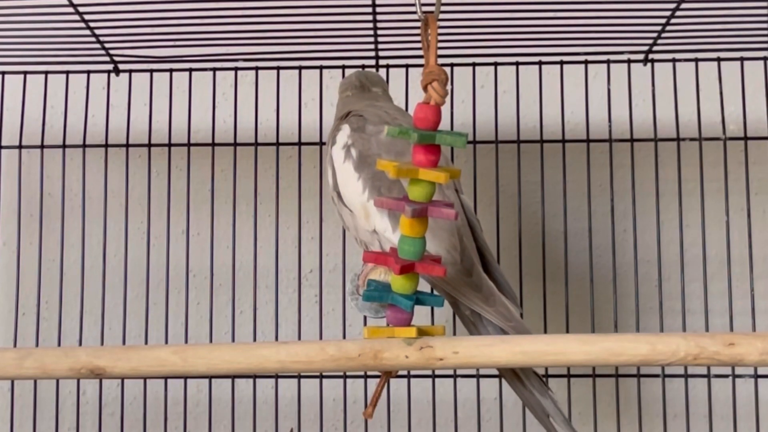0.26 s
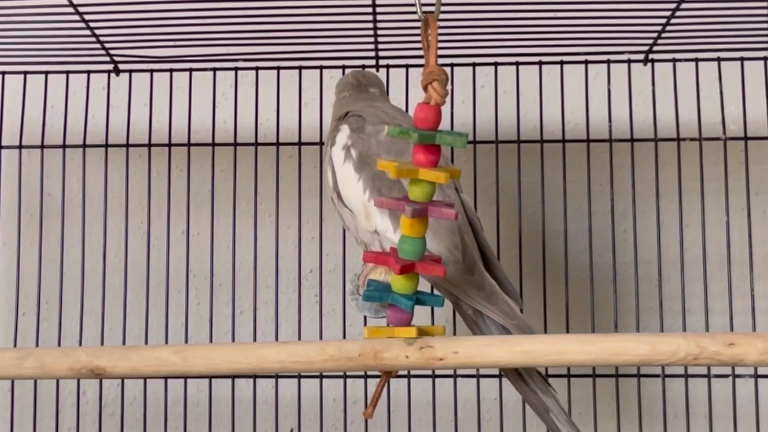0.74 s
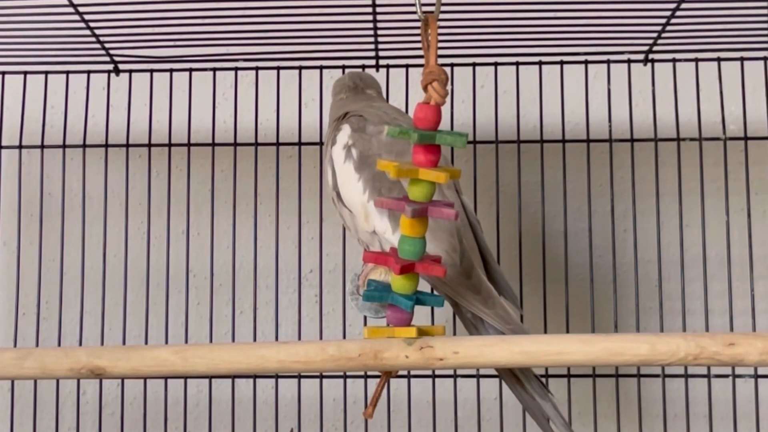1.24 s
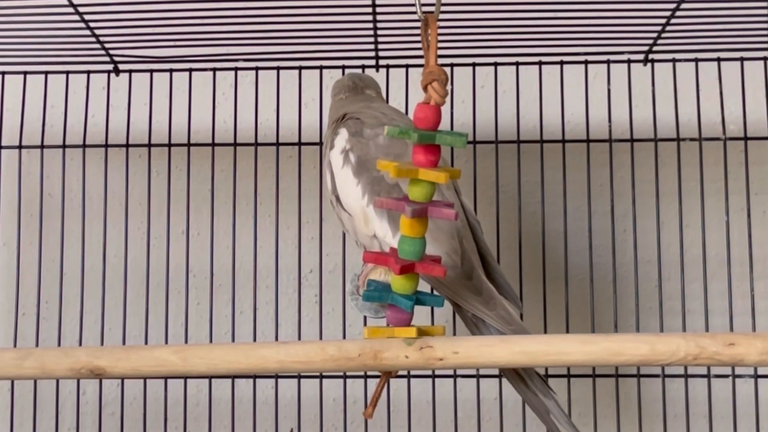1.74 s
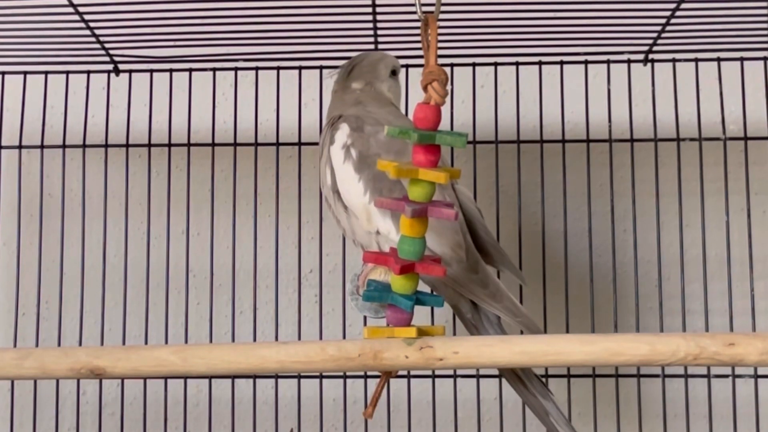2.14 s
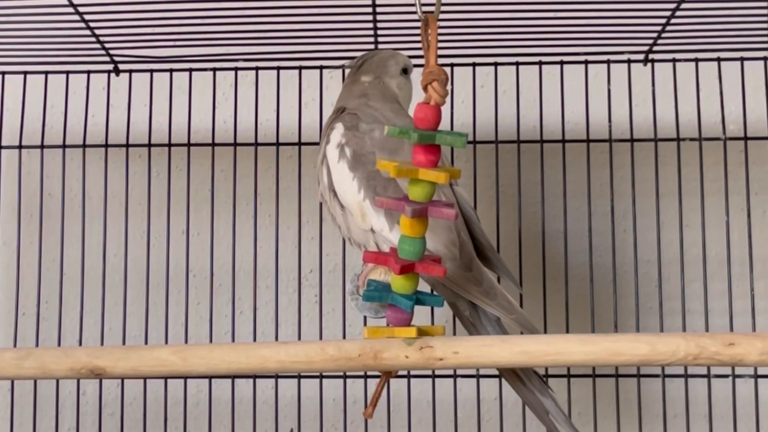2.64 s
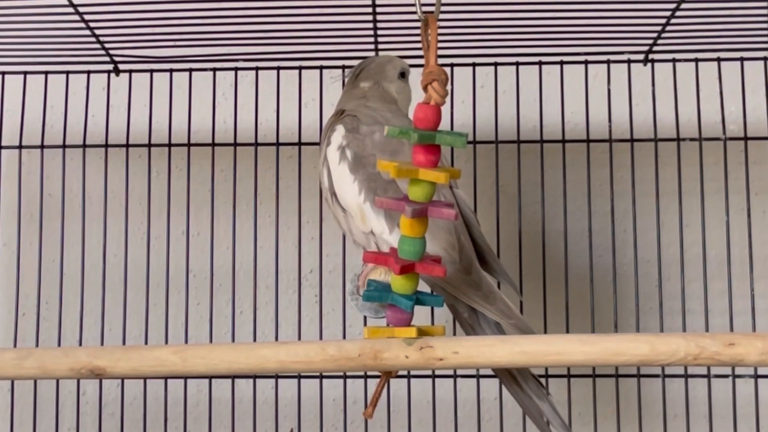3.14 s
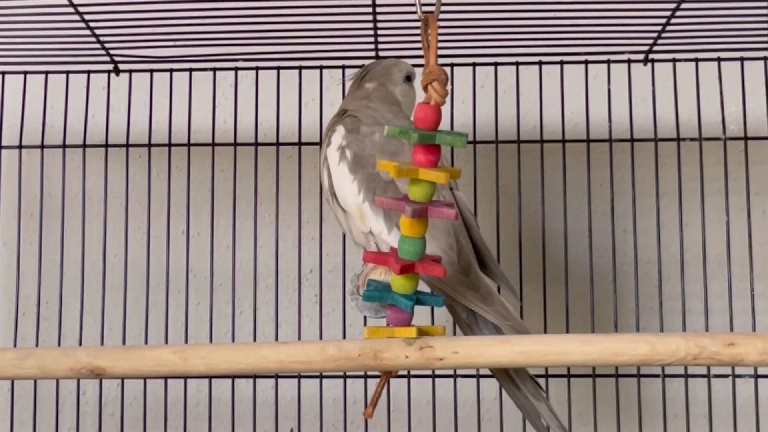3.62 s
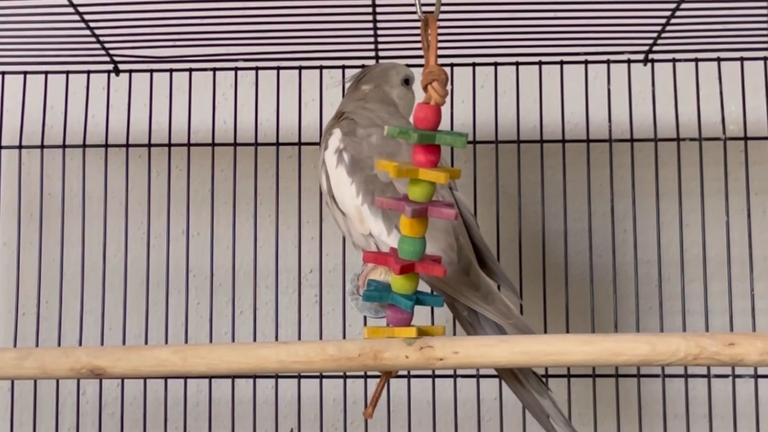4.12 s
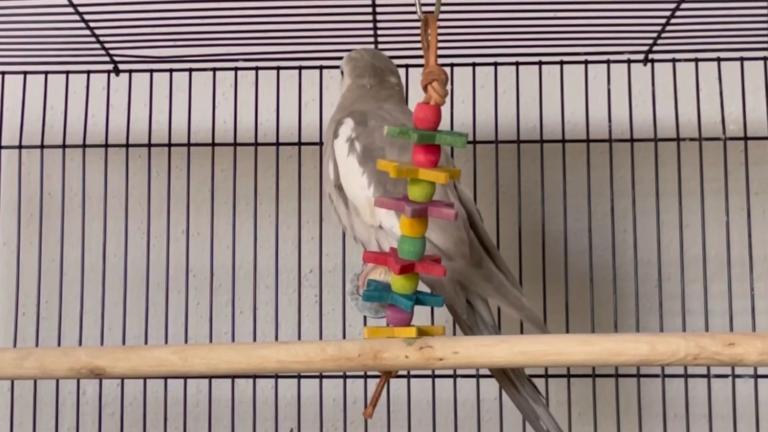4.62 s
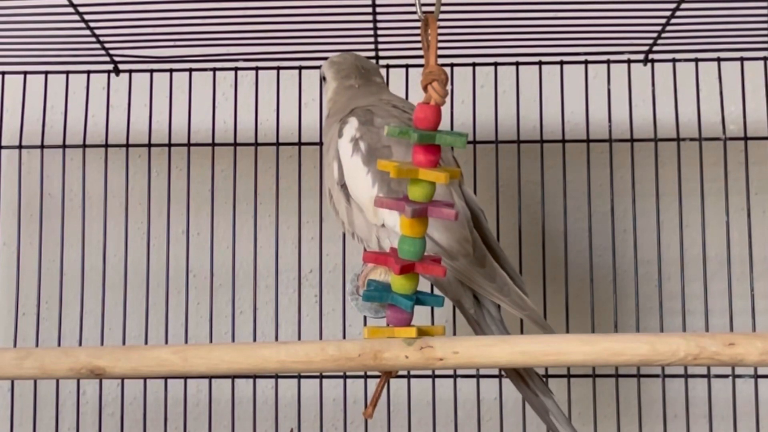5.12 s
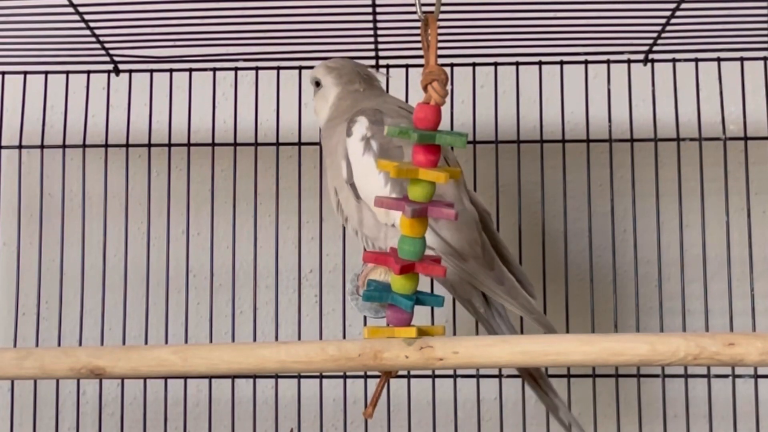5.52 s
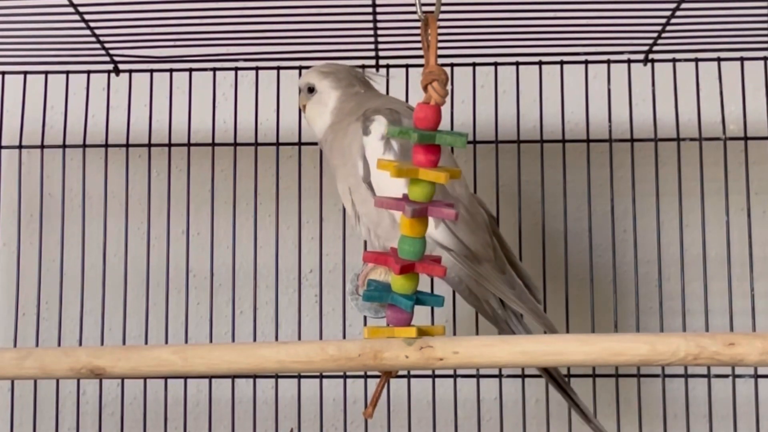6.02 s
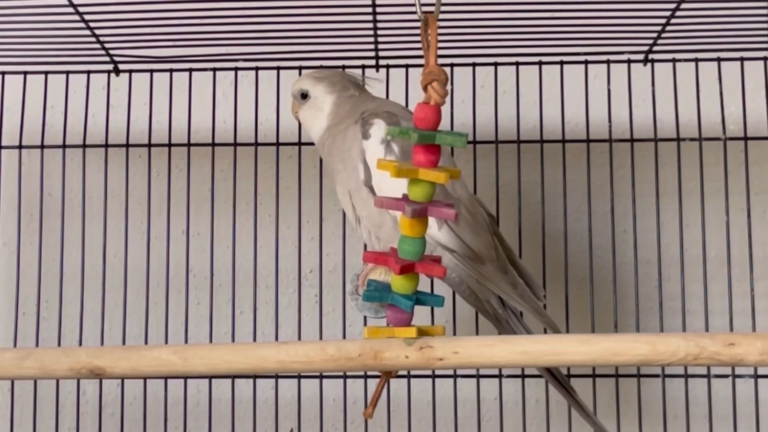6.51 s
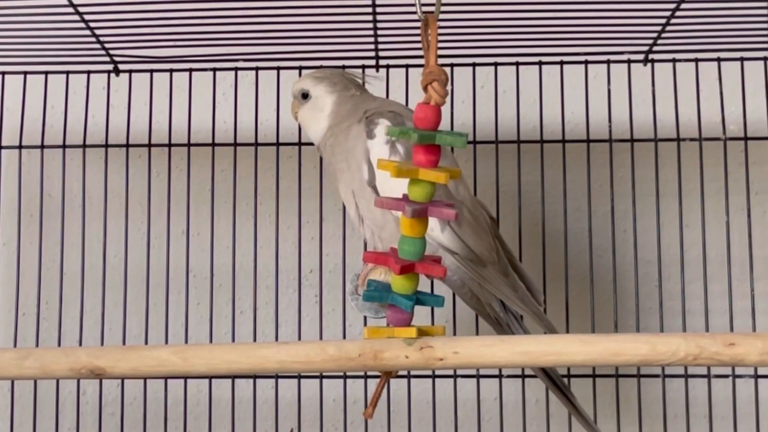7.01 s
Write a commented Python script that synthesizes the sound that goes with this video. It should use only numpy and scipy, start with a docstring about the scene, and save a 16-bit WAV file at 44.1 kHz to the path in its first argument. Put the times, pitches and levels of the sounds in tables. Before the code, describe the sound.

Close stereo pickup of one cockatiel in a small hard-walled room with lively echo and faint low rumble. It gives isolated clear whistles and quiet husky chips, rests, then buzzes softly and slides through longer whistles, one sweeping strongly upward. After a second rest come rough, bright chirps, quick chips and a row of four calls that break downward, then a swelling buzzy trill and a tiny final note.

```python
"""Cockatiel in a cage

A cockatiel sings in its cage in a small, bare room with a low hum. Beak nearly shut: almost pure gliding
whistles and buzzing trills. Beak open: bright calls, arches that break up as they fall, short chips.
Each note is a sum of overtones coloured by the throat, plus turbulence where rough; the walls ring on.
"""
import sys
import numpy as np
from scipy import signal
from scipy.fft import rfft, irfft, next_fast_len
from scipy.io import wavfile
from scipy.ndimage import map_coordinates

SR = 44100
rng = np.random.default_rng(int(sys.argv[2]) if len(sys.argv) > 2 else 0)


def put_to_file(sound):
    """Save the sound as 16-bit audio at rate SR, in the file named by the first command-line argument."""
    columns = np.atleast_2d(sound).T  # one column per channel
    safe = np.clip(columns, -1, 1)
    whole_steps = np.round(safe * 32767)
    wavfile.write(sys.argv[1], SR, whole_steps.astype(np.int16))


N = 320166
TOP_HZ = 15700  # band limit
ATTACK_S, RELEASE_S = 0.004, 0.006


def amp(db):
    """Decibels to gain."""
    return 10 ** (np.asarray(db) / 20)


def unit(x):
    """Scale to rms 1."""
    return x / np.sqrt(np.mean(x ** 2) + 1e-20)


def along(points, hz):
    """Interpolate (freq_hz, value) points on a log frequency axis."""
    freq_hz, value = np.transpose(points)
    return np.interp(np.log(hz + 1), np.log(freq_hz), value)


def wobble(rate_hz, size):
    """Smooth random curve with rate_hz knots a second."""
    knots = rng.standard_normal(int(size * rate_hz / SR) + 4)
    return map_coordinates(knots, [np.arange(size) * rate_hz / SR])


def filtered(x, response):
    """Multiply the spectrum of x by a complex response of frequency."""
    size = x.shape[-1]
    padded = next_fast_len(size + 2048)
    spectrum = rfft(x, padded) * response(np.fft.rfftfreq(padded, 1 / SR))
    return irfft(spectrum, padded)[..., :size]


def noise(spectrum, shape):
    """Coloured noise of rms 1."""
    white = rng.standard_normal(shape)
    return unit(filtered(white, lambda hz: amp(along(spectrum, hz))))


def add(track, start_s, sound):
    """Mix a sound into a track at start_s."""
    part = track[max(round(start_s * SR), 0):][:len(sound)]
    part += sound[:len(part)]


def clock(length_s):
    """Time within a note in seconds, and its progress 0-1."""
    t = np.arange(int((length_s + RELEASE_S / 2) * SR)) / SR
    return t, np.minimum(t / length_s, 1)


def fade(t):
    """Attack, hold and release of a note."""
    nearest_end = np.minimum(t / ATTACK_S, (t[-1] - t) / RELEASE_S)
    return np.sin(np.pi / 2 * np.clip(nearest_end, 0, 1)) ** 2


def push(u, crest, swell_db, shape=1.12):
    """One push of air: dB below its peak at share crest of the note; shape above 1 rounds the peak."""
    return swell_db * (np.abs(u - crest) / max(crest, 1 - crest)) ** shape


# throat colour, beak shut: freq_hz, level_db (relative)
THROAT_SHUT = [(600, -28), (1300, -10.5), (1750, -12.5), (2600, -8), (3000, -9.5), (3700, -16), (5200, -19),
               (7800, -23), (8700, -30), (10400, -23), (13000, -14), (15500, -31)]
# throat colour, beak open: freq_hz, level_db (relative)
THROAT_OPEN = [(600, -33), (1500, -2), (2200, 0), (2650, -7), (3200, 6), (3800, -7.5), (4500, 3.5),
               (5100, -24), (5700, -2), (6700, -18), (7700, -26.5), (9500, -23.5), (11300, -25.5),
               (12500, -38.5)]
# turbulence spectrum of a rough note: freq_hz, density_db (relative, per Hz)
TURBULENCE = [(300, -45.5), (700, -29), (1300, -8.5), (2100, -11), (2900, -2.5), (3600, -13), (5300, -24.5),
              (7500, -50), (15000, -64)]


def syrinx(hz, rough, opening, jitter=0.079, flutter=0.09, tremor=0.0061, shimmer_db=6, doubling=0.35,
           rasp_db=-1, shut_db=-22, open_db=-2, slope_db=-4, slack_db=-12, taut_hz=2600):
    """Vibrating membranes heard through the throat; roughness shakes their cycle and adds turbulence."""
    size, rough = len(hz), np.clip(rough, 0, 1)
    shake = rough * (jitter * wobble(1100, size) + flutter * wobble(260, size))
    unsteady = shake + tremor * wobble(350, size)
    phase = 2 * np.pi * np.cumsum(hz * (1 + unsteady)) / SR
    k = np.arange(1, 9)[:, None]  # harmonic number
    shut = 1 - opening
    # an open beak brings out the overtones; slack membranes make low whistles duller
    octave_db = slope_db + slack_db * shut * np.log2(taut_hz / hz)
    overtone_db = shut * shut_db + opening * open_db + octave_db * np.log2(k / 2)
    throat_db = shut * along(THROAT_SHUT, k * hz) + opening * along(THROAT_OPEN, k * hz)
    partials = amp(throat_db + (k > 1) * overtone_db) * (k * hz < TOP_HZ)
    tone_rms = np.sqrt(np.sum(partials ** 2, axis=0) / 2)
    tone = np.sum(partials * np.sin(k * phase), axis=0) / tone_rms
    # a rough note breaks into spurts, its cycles alternately strong and weak
    spurts = amp(rough * shimmer_db * wobble(330, size))
    alternation = 1 + rough ** 2 * doubling * np.sin(phase / 2)
    tone = tone * spurts * alternation
    turbulence = amp(rasp_db) * rough ** 2 * noise(TURBULENCE, size) * (1 + np.cos(phase) / 2)
    return (tone + turbulence) / np.sqrt(1 + rough ** 2)


SLACK_SHARE, SLACK_S = 0.63, 0.011  # pitch share a broken note sinks to, time constant
BREAK_S, FADE_DB_PER_S = 0.0026, 99.5  # onset of the break, decay of the fall
BREAK_DB, ROUGH_BREAK_DB = 4.5, 15  # loss in a clean break, extra loss in a fully rough one
FRAY_S, FRAY_ROUGH = 0.012, 0.13  # extra roughness around the break


def sung(t, length_s, hz, db, rough, opening, overtone_db, fall_rough, slack_s):
    """Note that may break after length_s: slack membranes lower its pitch and level, roughness shifts."""
    after_s = np.maximum(t - length_s, 0)
    broken = 1 - np.exp(-after_s / BREAK_S)
    frayed = np.exp(-np.abs(t - length_s - BREAK_S) / FRAY_S)
    pitch_hz = hz * (SLACK_SHARE + (1 - SLACK_SHARE) * np.exp(-after_s / slack_s))
    loss_db = (BREAK_DB + ROUGH_BREAK_DB * fall_rough) * broken + FADE_DB_PER_S * after_s
    rough = rough + (fall_rough - rough) * broken + FRAY_ROUGH * frayed
    voice = syrinx(pitch_hz, rough, opening, shut_db=overtone_db, open_db=overtone_db)
    return fade(t) * amp(db - loss_db) * voice


def glides(notes, opening, clean, hoarse, bend=1.8):
    """Swelling notes that glide, lingering near the top; the weaker the air at the start, the hoarser."""
    track = np.zeros(N)
    for (start_s, length_s, start_hz, end_hz, peak_db, crest, swell_db,
         overtone_db, fall_s, fall_rough) in notes:
        t, _ = clock(length_s + fall_s)
        u = np.minimum(t / length_s, 1)
        way = 1 - (1 - u) ** bend if end_hz > start_hz else u ** bend
        pitch_hz = start_hz + (end_hz - start_hz) * way
        weak_db = push(u, crest, swell_db)
        rough = clean + hoarse * (u < crest) * (weak_db / 20) ** 2
        held_s = length_s if fall_s > ATTACK_S else np.inf  # without a fall the note never breaks
        note = sung(t, held_s, pitch_hz, peak_db - weak_db, rough, opening, overtone_db, fall_rough, SLACK_S)
        add(track, start_s, note)
    return track


# whistles: start_s, length_s, start_hz, end_hz, peak_db, crest (0-1), swell_db, overtone_db,
# fall_s, fall_rough (0-1)
WHISTLES = [ (0, 0.046, 2626, 2519, -15.5, 0.3, 2.5, -21, 0.047, .17),
            (.285, .012, 2010, 1889, -35, 1, 4.5, -17, 0.029, .4),
            (.997, .032, 3162, 2735, -16, .9, 11.5, -24.5, .007, .4),
            (1.137, 0.085, 2270, 2536, -16.5, .95, 21, -20.5, 0.0658, .2),
            (1.359, 0.021, 2960, 2694, -16.5, .7, 6, -22.5, 0.017, 0.1),
            (2.687, 0.03, 1200, 1483, -34, 1, 13, -21, 0, 0),
            (2.777, 0.03, 1210, 1316, -37, .7, 5, -13.5, 0.0054, 0),
            (3.033, .225, 1697, 1773, -27, 0.39, 12, -23, 0.0068, 0),
            (3.339, .108, 2464, 2684, -17.5, .45, 4.5, -26.5, 0.036, 0.7),
            (3.568, .225, 1210, 2755, -15, 0.68, 23.5, -24.5, 0.01, 0),
            (3.91, 0.076, 2850, 2905, -16, 0.9, 15.5, -29, 0.01, 0),
            (3.999, .006, 2758, 2738, -11, 0.6, 6, -21.5, 0.01, 0.1),
            (7.218, 0.061, 1312, 1348, -34, .95, 14, -24.5, 0, 0)]


def whistles():
    """Beak shut: the throat damps the overtones and leaves almost pure glides."""
    return glides(WHISTLES, opening=0, clean=0.045, hoarse=0.22)


# bright calls: start_s, length_s, start_hz, end_hz, peak_db, crest (0-1), swell_db, overtone_db,
# fall_s, fall_rough (0-1)
BRIGHT_CALLS = [ (5.123, .087, 1898, 1952, -28.5, 0.75, 11, 8, 0, 0),
                (5.206, .046, 1995, 2260, -24.5, .6, 5.6, -3, 0, 0),
                (5.432, .039, 1960, 2080, -22.5, 0.96, 15, 4, 0, 0),
                (5.606, .012, 2235, 2120, -29, 1, 9, 2, 0.094, .8)]


def bright_calls():
    """Beak almost fully open: strong overtones, hoarse while the air is weak."""
    return glides(BRIGHT_CALLS, opening=0.89, clean=0.13, hoarse=1.2)


# arched calls: start_s, length_s, top_hz, peak_db, overtone_db, fall_s
ARCHED_CALLS = [(5.878, .034, 2371, -18.5, 2, 0.039), (6.015, .028, 2374, -16, 0.5, 0.032),
                (6.126, .034, 2294, -15, 1, 0.019), (6.245, .039, 2311, -16, 2, 0.02)]


def arches(arch=0.092, swell_db=6, top_dip_db=2, clean=0.04, fall_rough=0.55, slack_s=0.016):
    """Beak open: pitch arches while the call swells, then it breaks into a rough downward slide."""
    track = np.zeros(N)
    for start_s, length_s, top_hz, peak_db, overtone_db, fall_s in ARCHED_CALLS:
        t, _ = clock(length_s + fall_s)
        u = np.minimum(t / length_s, 1)
        flank = (2 * u - 1) ** 2
        pitch_hz = top_hz * (1 - arch * flank)
        level_db = peak_db - swell_db * (1 - u) - top_dip_db * (1 - flank)
        add(track, start_s, sung(t, length_s, pitch_hz, level_db, clean, 1, overtone_db, fall_rough, slack_s))
    return track


# chip runs: start_s, count, spacing_s, length_s, pitch_hz, level_db, rough (0-1)
CHIPS = [(0.495, 1, .02, 0.018, 1691, -34.5, 0.3), (.616, 3, .024, .019, 1872, -32.5, 0.36),
         (0.678, 2, 0.018, .028, 1801, -35, 0.6), (.834, 2, 0.02, .027, 1748, -33.5, .36),
         (.886, 2, 0.016, .024, 1703, -32, 0.56), (5.709, 3, .019, 0.011, 2245, -21.5, 0.1),
         (5.846, 2, 0.018, 0.018, 2301, -20, 0.14)]


def chips(arch=0.044, fall=0.03, wide_hz=2200, sag=0.011, overtone_db=2):
    """One short push of air each: pitch and loudness arch together; each run sags in pitch."""
    track = np.zeros(N)
    for start_s, count, spacing_s, length_s, pitch_hz, level_db, rough in CHIPS:
        opening = min(pitch_hz / wide_hz, 1)  # the beak opens further for higher chips
        u = np.linspace(-1, 1, int(length_s * SR))
        swell = amp(level_db) * np.cos(np.pi / 2 * u)
        for k in range(round(count)):
            hz = pitch_hz * (1 - sag * k - arch * u ** 2 - fall * u)
            chip = syrinx(hz, np.full(len(u), rough), opening, jitter=0.035, flutter=0.045,
                          rasp_db=4, open_db=overtone_db)
            add(track, start_s + k * spacing_s, swell * chip)
    return track


# trills: start_s, length_s, start_hz, end_hz, peak_db, crest (0-1), swell_db, rough (0-1)
TRILLS = [(2.878, .086, 2036, 1848, -29, .5, 9.5, 0.4), (5.346, 0.11, 2270, 2075, -35, 0.5, 4, 0.5),
          (6.838, .25, 2287, 2220, -21, 1, 9, 0.24)]


def trills(pulse_hz=68.03, sweep=0.38, sharpness=2.0, slope_db=-10, widest=0.18):
    """Airflow chopped into pulses, each a tiny downward glide; the beak opens a little as they swell."""
    track = np.zeros(N)
    for start_s, length_s, start_hz, end_hz, peak_db, crest, swell_db, rough in TRILLS:
        t, progress = clock(length_s)
        hz = start_hz + (end_hz - start_hz) * progress
        effort = amp(-push(progress, crest, swell_db))
        u = (pulse_hz * t + 0.023 * wobble(31, len(t))) % 1 - 0.5  # place within a pulse
        pulses = np.cos(np.pi * u) ** sharpness * amp(1.7 * wobble(pulse_hz, len(t)))
        tone = syrinx(hz * (1 - sweep * u), np.full(len(t), rough), opening=widest * effort,
                      slope_db=slope_db)
        add(track, start_s, amp(peak_db) * fade(t) * effort * pulses * tone)
    return track


def feathers(center_s=4.5, width_s=0.0028, level_db=-66):
    """Faint rustle as the bird turns its head: a short bell-shaped burst of treble noise."""
    t = np.arange(N) / SR
    burst = np.exp(-((t - center_s) / width_s) ** 2)
    return amp(level_db) * burst * noise([(3000, -54.5), (6000, -5), (8000, -9.0), (13000, -16)], N)


# resonances of cage wires: pitch_hz
CAGE_WIRES = [2408, 2300, 2400, 2490, 2950, 2907]


def cage(x, ring_db=-87, t60_s=1.45):
    """A few wires ring faintly along with the notes, each a decaying sine."""
    t = np.arange(2 * SR) / SR
    ring = amp(ring_db - 60 * t / t60_s) * sum(np.sin(2 * np.pi * hz * t) for hz in CAGE_WIRES)
    return signal.fftconvolve(x, ring)[:N]


def placed(x, lead_ms, pan_db):
    """Direct sound: reaches the left microphone slightly first."""
    sides = np.array([[0.5], [-0.5]])
    lead_s = sides * lead_ms / 1000
    return amp(sides * pan_db) * filtered(x, lambda hz: np.exp(2j * np.pi * hz * lead_s))


# decay of the tail: freq_hz, t60_s
ROOM_DECAY = [(600, 0.95), (2600, 0.62), (6000, 0.73), (14000, 0.094)]


def room(x, early_db=-12, tail_db=-5.5, early_decay_s=0.075, swell_s=0.00078):
    """Close walls answer at once; a diffuse tail follows, its decay time set by frequency."""
    hz, t, z = signal.stft(rng.standard_normal((2, SR)), SR, nperseg=256)
    decay = amp(-60 * t / along(ROOM_DECAY, hz)[:, None])
    tail = signal.istft(z * decay, SR, nperseg=256)[1]
    t = np.arange(tail.shape[1]) / SR
    onset = 1 - np.exp(-t / swell_s)
    tail = tail * onset
    early = rng.standard_normal(tail.shape) * onset * np.exp(-t / early_decay_s)
    answer = amp(tail_db) * tail / np.linalg.norm(tail[0])
    answer = answer + amp(early_db) * early / np.linalg.norm(early[0])

    def mid_side(hz):
        # the two close microphones hear the low part of the echo more alike
        alike = along([(1000, 0.43), (2500, 0.36), (6000, 0.25)], hz)
        turn = np.arccos(np.clip(alike, -1, 1)) / 2
        return np.array([np.cos(turn), np.sin(turn)])

    mid, side = filtered(answer, mid_side)
    return signal.fftconvolve(x[None], np.array([mid + side, mid - side]), axes=1)[:, :N]


# room rumble: freq_hz, density_db (relative, per Hz)
RUMBLE = [(27, -26), (52, 1.5), (82, -10), (105, -9), (141, -23), (200, -25), (400, -37.5), (1000, -54.5)]
# hum tones: freq_hz, level_db (rms, before the left-right tilt)
HUM_TONES = [(49.5, -64), (100, -75.5), (176, -84.5)]


def background(rumble_db=-61, apart_db=-11, hiss_db=-84):
    """Rumble noise and phase-wavering hum sines, stronger on the right, under faint hiss."""
    t = np.arange(N) / SR
    hum = sum(amp(db) * np.sqrt(2) * np.sin(2 * np.pi * hz * t + 0.5 * wobble(0.58, N))
              for hz, db in HUM_TONES)
    rumble = amp(rumble_db) * (noise(RUMBLE, N) + amp(apart_db) * noise(RUMBLE, (2, N)))
    sides = np.array([[-0.5], [0.5]])
    low = filtered(hum + rumble, lambda hz: amp(sides * along([(70, 5.5), (250, 0.0)], hz)))
    hiss = noise([(170, -19.5), (500, -5.0), (5000, -34.5), (15000, -62)], (2, N))
    return low + amp(hiss_db) * hiss


def scene():
    """The bird faces away for its whistles and trills and turns to the side for its bright calls."""
    soft = whistles() + trills() + feathers()
    bright = bright_calls() + arches() + chips()
    direct = placed(soft, lead_ms=0.032, pan_db=-1.1) + placed(bright, lead_ms=0.041, pan_db=-0.4)
    bird = direct + room(soft + bright) + cage(soft + bright)
    # so small a throat radiates little bass
    bird = filtered(bird, lambda hz: amp(along([(250, -17), (1100, -1.0)], hz)))
    return bird + background()


def record(dry):
    """Cut everything from the band limit up."""
    return filtered(dry, lambda hz: hz < TOP_HZ)


dry = scene()
out = record(dry)
put_to_file(out)
```